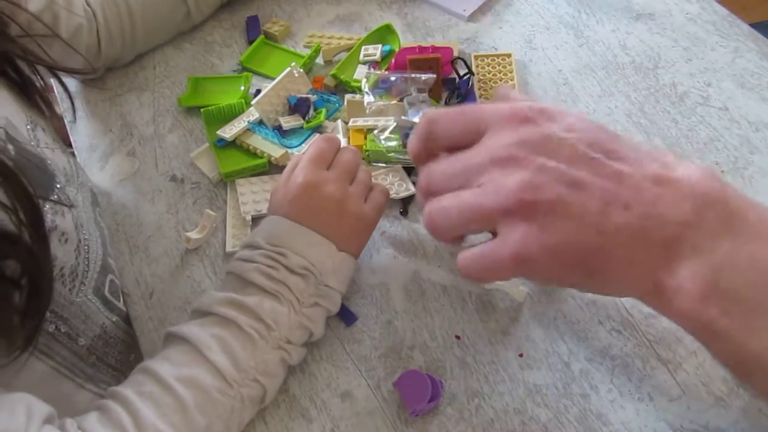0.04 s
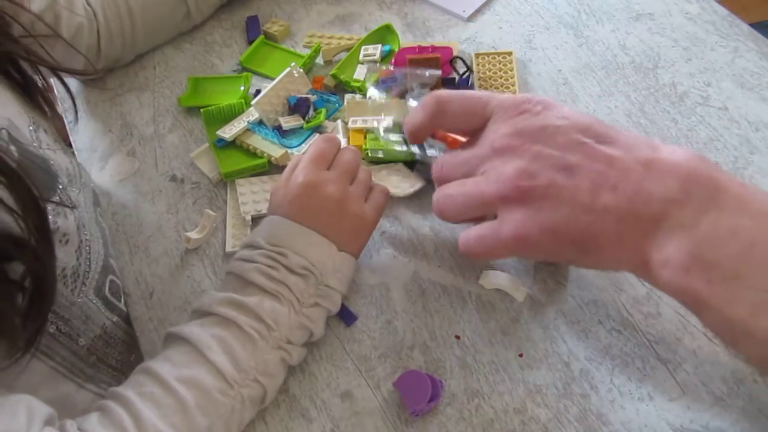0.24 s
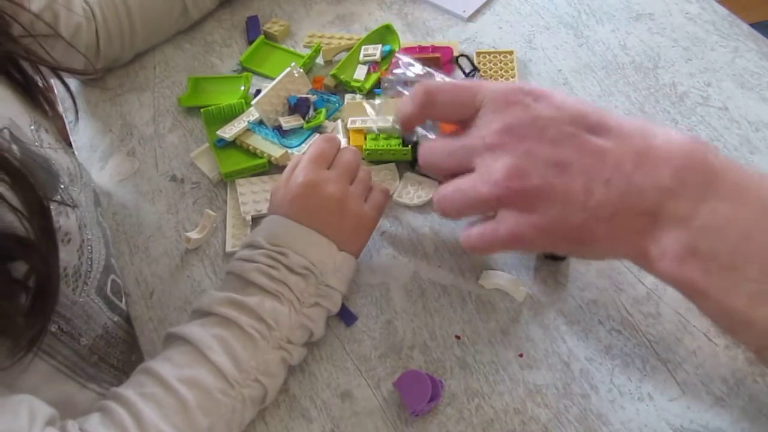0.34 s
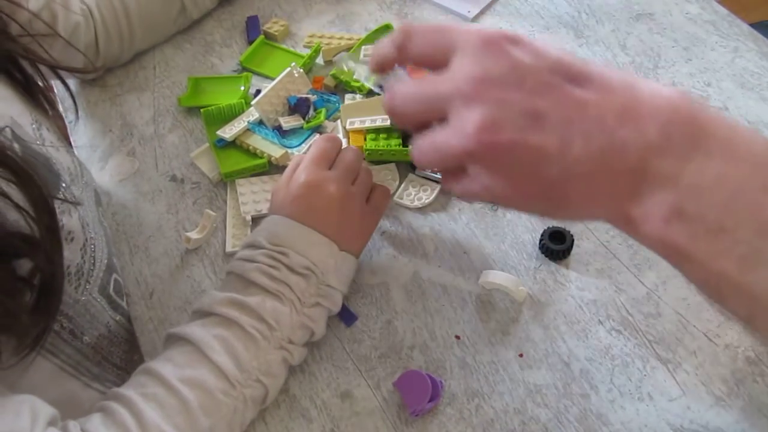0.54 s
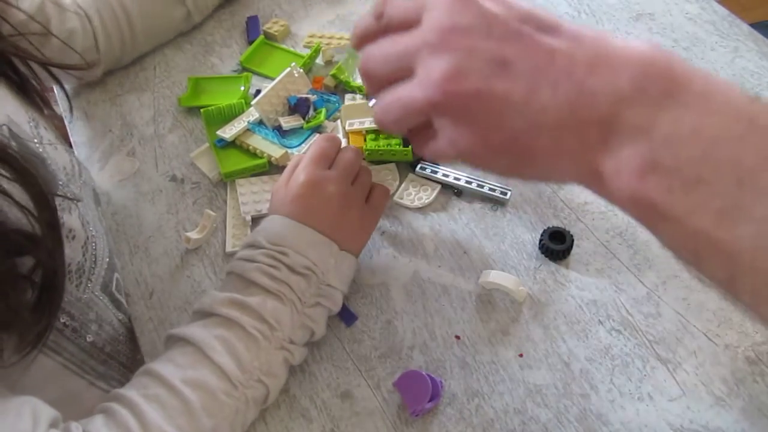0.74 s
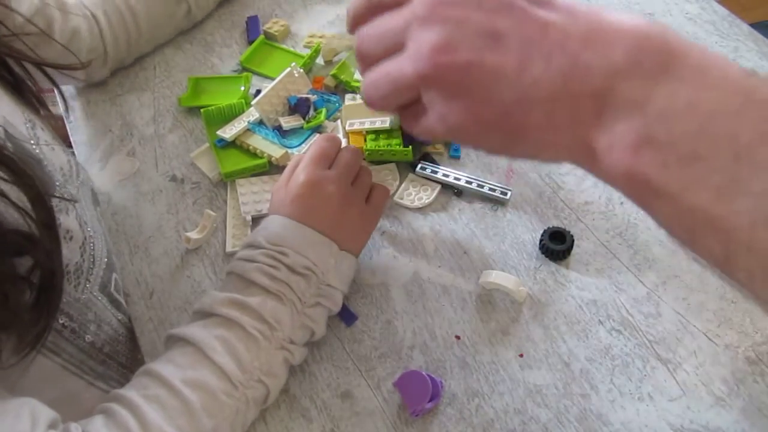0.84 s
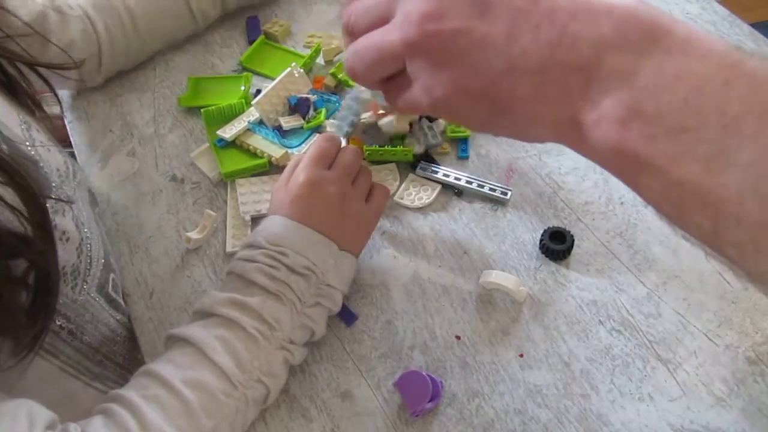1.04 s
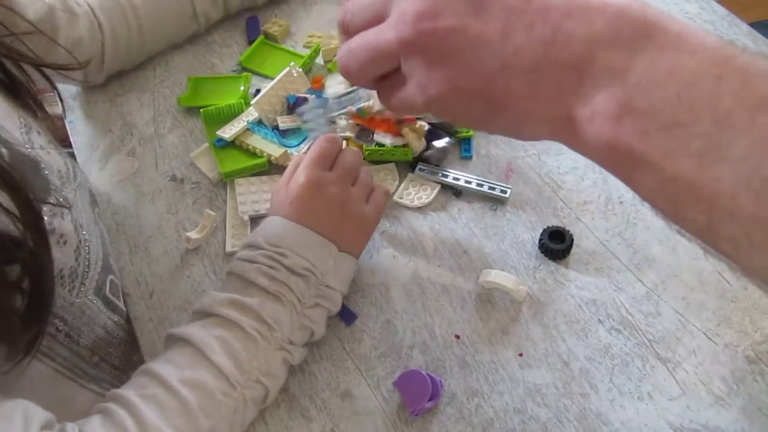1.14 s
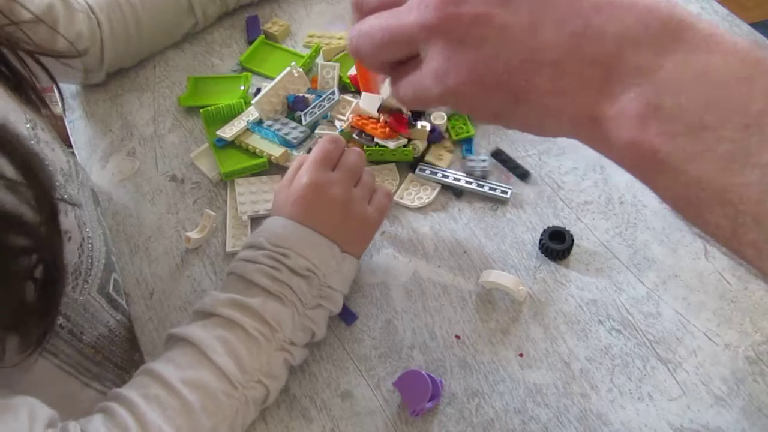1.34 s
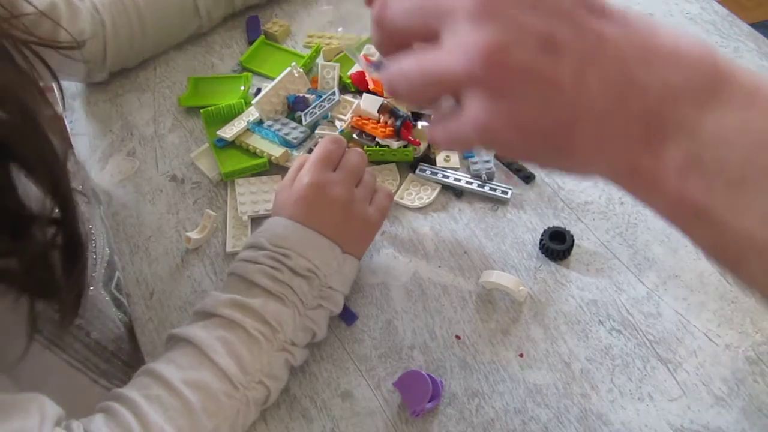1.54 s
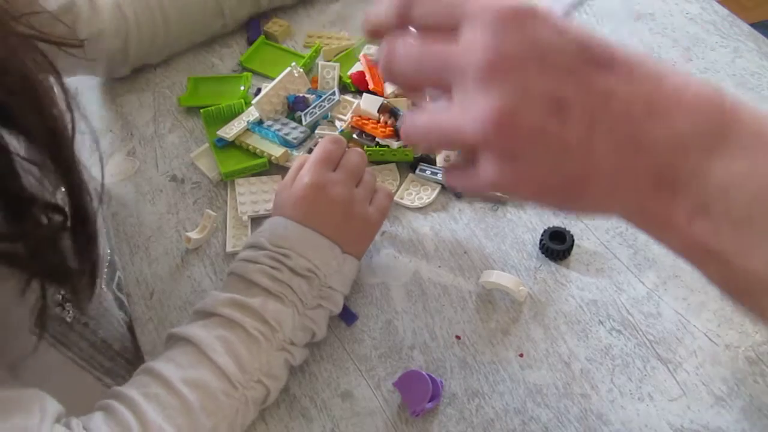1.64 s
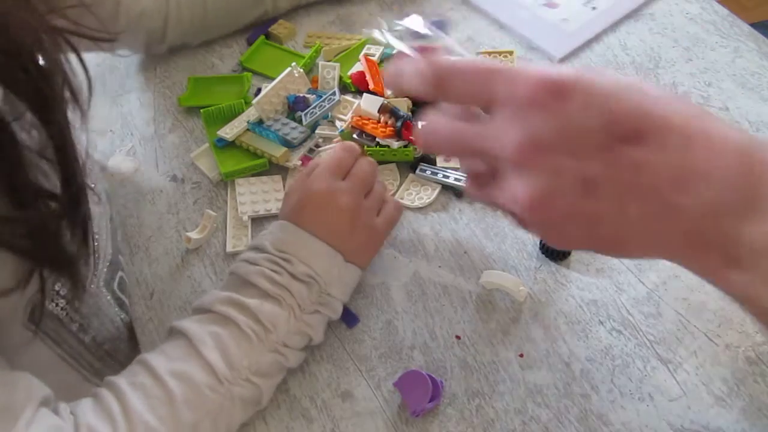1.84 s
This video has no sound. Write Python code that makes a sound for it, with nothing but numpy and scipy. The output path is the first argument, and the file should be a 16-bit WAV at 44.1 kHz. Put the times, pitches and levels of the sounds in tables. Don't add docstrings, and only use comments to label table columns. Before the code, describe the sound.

Bright, dry clatter of toy bricks tipped out twice, with one loud lone clack between, faint table thumps, bag snaps and a soft sleeve rub at the end; close microphone, small quiet room.

```python
import sys
import numpy as np
from scipy import signal
from scipy.fft import rfft, irfft, next_fast_len
from scipy.io import wavfile
from scipy.ndimage import uniform_filter1d

SR = 44100
rng = np.random.default_rng(int(sys.argv[2]) if len(sys.argv) > 2 else 0)


def boost_factor(decibels):
    exponent = np.asarray(decibels, float) / 20
    return 10 ** exponent


def inscribe(sig):
    pcm = np.round(np.clip(np.atleast_2d(sig).T, -1, 1) * 32767)
    wavfile.write(sys.argv[1], SR, pcm.astype(np.int16))


N = 83790


def rms_one(x):
    return x / np.sqrt(np.mean(x ** 2) + 1e-20)


def in_time(rows):
    return np.interp(np.arange(N) / SR, *np.transpose(rows))


def colour(x, points):
    hz, db = np.transpose(points)
    f = np.maximum(np.fft.rfftfreq(len(x), 1 / SR), 1)
    return irfft(rfft(x) * boost_factor(np.interp(np.log(f), np.log(hz), db)), len(x))


def evened(burst):
    f = rfft(burst)
    local_power = uniform_filter1d(np.abs(f) ** 2, size=len(f) // 20)
    return irfft(f / np.sqrt(local_power), len(burst))


def drift(rate_hz):
    r = np.exp(-2 * np.pi * rate_hz / SR)
    wander = signal.lfilter([1], [1, -2 * r, r * r], rng.standard_normal(N + SR))
    return rms_one(wander[SR:])


def ring(drive, hz, t60_s):
    r = boost_factor(-60 / (t60_s * SR))
    w = 2 * np.pi * min(hz, .45 * SR) / SR
    return signal.lfilter([0, np.sin(w)], [1, -2 * r * np.cos(w), r * r], drive + 1e-18)


def clicks(per_s, spread_db):
    sizes = boost_factor(spread_db * np.minimum(rng.exponential(1, N), 4)) * rng.choice([-1, 1], N)
    return sizes * (rng.random(N) < per_s / SR)


# frequency in Hz, level in dB per Hz.
BRICK_SPECTRUM = [(240, -58), (400, -19), (687, -12), (1030, -14.5), (2930, -4), (3260, -4), (6150, -3.5),
                  (10700, -3), (13000, -20.5), (16000, -34)]
CONTACT_S = 0.0014


def knocks(rows, burst_s, ring_db=-7.5):
    out, t = np.zeros(N + SR), np.arange(2048) / SR
    rise_s, wall_t60_s, crack_db, hollow_q = 0.00031, .014, -1, 3.8
    fade = np.cos(t / t[-1] * np.pi / 2)
    spectrum_hz, spectrum_db = np.transpose(BRICK_SPECTRUM)
    octaves = np.log2(np.clip(spectrum_hz, 500, 11000) / 4000)
    for s, db, hz, tilt in rows:
        noise, draw = rng.standard_normal(len(t)), rng.random(4)
        span_s = burst_s * (.7 + .6 * draw[0])
        envelope = (1 - np.exp(-t / rise_s)) * np.exp(-t / span_s)
        burst = evened(noise * np.sqrt(np.abs(noise)) * envelope)
        hollow = signal.lfilter(*signal.iirpeak(hz, hollow_q, fs=SR), burst)
        walls = ring(burst, hz, wall_t60_s)
        for d in draw[1:]:
            walls = walls + .5 * ring(burst, min(hz * (.7 + d), 12000), wall_t60_s / 2)
        lean_db = np.clip(tilt, -7, 5) * octaves
        crack = colour(burst, np.transpose([spectrum_hz, spectrum_db + lean_db]))
        parts = [(0, hollow), (ring_db, walls), (crack_db, crack)]
        knock = sum(boost_factor(g) * v / np.abs(v).max() for g, v in parts)
        i = int(s * SR)
        out[i:i + len(t)] += boost_factor(db) * knock / np.abs(knock).max() * fade
    return out[:N]


# start in seconds, peak in dB, strongest ring in Hz, tilt in dB per octave.
FIRST_POUR = [(0.0004, -28.5, 3320, 1), (0.2179, -30, 4250, -11), (0.2776, -14, 6760, -10.5),
              (0.282, -19, 3990, -9), (0.2903, -15, 10100, 1), (0.3114, -9, 5140, -3.5),
              (0.3134, -17, 5430, -14), (0.3219, -17, 5030, -12), (0.3355, -14, 4860, 6),
              (0.3392, -13.5, 11700, -4), (0.3424, -18, 5300, -11), (0.3757, -12, 8300, -2),
              (0.3818, -11, 4830, 10), (0.3857, -9.5, 8940, -3.5), (0.409, -18.5, 2100, -4.5)]
FIRST_TICKS = [
    (.272, -21, 6710, -8),
    (.2958, -12.5, 7840, -2.5),
    (.2985, -13, 4500, -5),
    (.3055, -18, 5220, -4),
    (.3485, -22, 9000, 5),
    (.4006, -24, 8900, -1),
    (.459, -26, 9400, 1),
    (.4703, -24.5, 4280, -5.5),
    (.7635, -29, 11000, 6.5),
]
STRAGGLERS = [(0.5307, -20, 2640, 6.5), (0.6064, -24, 4160, 0), (0.616, -24.5, 2070, 1),
              (0.636, -24.5, 3980, 5), (0.6543, -18.5, 2510, 8), (0.6599, -19, 9200, -1.5),
              (0.6644, -14.5, 7170, -1), (0.6723, -18, 4330, -2.5), (0.7235, -18, 2140, 5.5),
              (0.7421, -17.5, 2180, 2), (0.752, -23, 2330, 2), (0.7818, -24, 2380, -4),
              (0.7974, -25, 1810, -4.5), (0.8116, -22.5, 2110, -2), (0.8734, -25.5, 4800, -12),
              (0.8845, -21, 7880, -9), (0.8966, -11.5, 8100, 4), (0.9128, -9, 10500, 9),
              (0.9468, -19, 7900, 2)]
SECOND_POUR = [(.9672, -10, 6980, 2.5), (.9719, -6.5, 8800, -1.5), (.9855, -18, 5500, 4),
               (.9948, -10, 9460, 2), (1.002, -10, 11900, 0), (1.0114, -13.5, 9250, 4),
               (1.0232, -17, 4940, 0), (1.0317, -11.5, 11500, 7), (1.046, -18, 3600, 7),
               (1.054, -17.5, 4900, 9), (1.0696, -13, 9000, 3), (1.074, -20, 5470, 7),
               (1.0897, -15, 7850, 6), (1.1005, -14, 10200, 7), (1.1105, -13.5, 10800, 10),
               (1.12, -12, 8200, 8), (1.129, -14, 11300, 4), (1.1334, -13.5, 3430, 6),
               (1.1375, -13, 10000, 6), (1.143, -15, 9000, 4), (1.1515, -12, 8200, 5),
               (1.1645, -15, 10600, 4), (1.179, -18, 3200, 5), (1.187, -11.5, 4800, 3),
               (1.192, -13.5, 4700, -3), (1.2005, -10, 12700, 5), (1.213, -14, 8000, 3),
               (1.3215, -14, 8900, 6), (1.3276, -7, 10900, 4), (1.3325, -15.5, 8700, 9),
               (1.3402, -15, 6400, 4), (1.3725, -19.5, 3140, 1), (1.3795, -19, 6300, 2),
               (1.393, -20.5, 3130, 1)]
TICKS = [
    (.2405, -19.5, 3300, -6),
    (1.5965, -23, 807, -4),
    (.2478, -15.5, 3900, -11),
    (.7358, -15.5, 3860, -0.5),
    (.2552, -17, 5160, -5),
    (0.48, -24, 4200, -4),
    (1.6275, -18.5, 10100, -5.5),
    (1.857, -34.5, 3560, 3),
]


def pour_knocks():
    first = knocks(FIRST_POUR, CONTACT_S * 1.35) + knocks(FIRST_TICKS, CONTACT_S * 1.04)
    between = knocks(STRAGGLERS, CONTACT_S * 1.62)
    second = knocks(SECOND_POUR, CONTACT_S * 1.37, ring_db=-3.0)
    return first + between + second + knocks(TICKS, CONTACT_S * 1.34)


# frequency in Hz, width in Hz, level in dB.
CLACKS = [
    ((.2612, -8.5, .0004), [(544, 330, -11), (1580, 310, -1.5), (4680, 770, 1), (3600, 550, -6), (8450, 1000, -4.5), (10400, 900, -13)]),
    ((.5619, -3, .00016), [(1810, 290, -15), (2980, 410, -12), (3850, 340, -9), (5300, 510, -0.5), (7040, 1240, 0.5), (8300, 1600, 0), (10200, 480, -4.5), (12300, 830, -12.5)]),
    ((1.2628, -10.5, 0.0031), [(800, 700, -12), (4500, 900, -7), (1620, 650, -7.5), (2330, 390, 1.5), (3130, 430, 1), (5570, 270, -16), (7900, 230, 0), (9200, 230, 1)]),
    ((1.5661, -11, .0009), [(1120, 380, -10), (2290, 330, -7.5), (3380, 240, -6.5), (4820, 410, -2), (5880, 380, -4.5), (8000, 510, -1.5), (8810, 350, -4), (10100, 320, 0.5), (11900, 450, -13)]),
    ((1.699, -15, 0.00047), [(4260, 310, -7), (5940, 400, 0), (8200, 820, -3), (9600, 860, -2), (12600, 1800, -10)]),
]


def clacks():
    out, t = np.zeros(N + SR), np.arange(1024) / SR
    fade = np.cos(t / t[-1] * np.pi / 2)
    for (s, db, contact_s), modes in CLACKS:
        touch = evened(rng.standard_normal(len(t)) ** 3 * np.exp(-t / contact_s))
        clack = 0
        for j, (hz, width_hz, mode_db) in enumerate(modes):
            mode = signal.lfilter(*signal.iirpeak(hz, hz / width_hz, fs=SR), touch)
            clack = clack + boost_factor(mode_db) * (-1) ** j * mode
        clack = colour(clack, [(200, -30), (900, 0.5), (12500, -0.5), (16000, -13)]) * fade
        i = int(s * SR)
        out[i:i + len(t)] += boost_factor(db) * clack / np.abs(clack).max()
    return out[:N]


# time in seconds, level in dB.
FLOW = [(0, -55.5), (.19, -56.5), (.24, -32), (.31, -27.5), (.36, -35.5), (.42, -32.5), (.5, -45),
        (.64, -49.5), (.69, -39), (.77, -39.5), (.86, -45), (.95, -35), (.985, -28), (1.2, -28),
        (1.3, -33.5), (1.38, -32.5), (1.47, -49), (1.9, -51.5)]


def pour_flow():
    return in_time(FLOW)


STUD_HZ = [3224, 4890, 5320, 7960, 9280, 10730, 11930]


def clatter(flow_db):
    rate, spread_db = 5000 * boost_factor(3.0 * drift(90)), 2
    impacts, dealt = clicks(rate, spread_db), rng.integers(0, 40, N)
    pitches = np.geomspace(500, 15500, 40)
    rings = sum(ring(impacts * (dealt == k), hz, .011) for k, hz in enumerate(pitches))
    rings = rms_one(colour(rings, [(500, -2), (14000, 7)]))
    studs = sum(ring(clicks(rate / 40, spread_db), hz, 0.025) for hz in STUD_HZ)
    studs = boost_factor(-7) * rms_one(studs) * boost_factor(0.39 * (flow_db - flow_db.max()))
    decay = np.exp(-1 / (CONTACT_S * SR))
    bumps = signal.lfilter([1], [1, -decay], np.abs(clicks(400, 2.5)))
    rustle = rng.standard_normal(N) * (bumps + .15)
    mixed = rms_one(rings + studs) + boost_factor(-4.0) * rms_one(rustle)
    return boost_factor(flow_db) * rms_one(colour(mixed, BRICK_SPECTRUM))


# start in seconds, peak in dB, strongest ring in Hz, tilt in dB per octave.
SNAPS = [
    (1.479, -24.5, 6830, -2),
    (1.487, -30, 1650, -26.5),
    (1.508, -28, 3570, -7),
    (1.6085, -25.5, 1730, -2),
    (1.622, -13, 11300, -0.8),
    (1.744, -27.5, 4370, -1),
]
SHARP = [
    (.2014, -20, 9000, -4.5),
    (.2298, -15, 2230, -2),
    (.4378, -8, 6300, -2),
    (.8405, -27, 9000, 2),
]


def bag_snaps():
    return knocks(SNAPS, CONTACT_S * 0.72) + knocks(SHARP, .0003, ring_db=-11.0)


# start in seconds, peak in dB.
THUMPS = [(0.246, -36), (0.286, -36), (0.357, -29), (0.469, -41.5), (0.615, -42), (0.659, -40.5),
          (0.782, -39.5), (0.879, -40), (0.909, -34.5), (0.968, -32), (1.016, -31.5), (1.208, -29),
          (1.428, -40), (1.752, -56), (1.843, -39)]
# frequency in Hz, level in dB, t60 in seconds.
TABLE_MODES = [(130, -29, 0.1), (185, -8.5, 0.2), (205, -0.5, 0.27), (255, -3, 0.12), (296, -7, 0.1),
               (418, -6.5, 0.059), (502, -2, 0.046), (687, -3, 0.055)]


def table_top(flow_db):
    patter = boost_factor(-69.5) * rms_one(clicks(300, 4.2)) * boost_factor(flow_db - flow_db.max())
    s, thump_db = np.transpose(THUMPS)
    out = 0
    for hz, db, t60_s in TABLE_MODES:
        heavy = np.zeros(N)
        sizes = boost_factor(thump_db - 7.0 + rng.normal(0, 1.0, len(s)))
        heavy[(s * SR).astype(int)] = sizes * rng.choice([-1, 1], len(s))
        out = out + boost_factor(db) * ring(heavy + patter, hz, t60_s)
    hum = boost_factor(-61.5) * rms_one(ring(rng.standard_normal(N), 243.8, 1.2))
    begun = np.clip((np.arange(N) / SR - 0.21) * 20, 0, 1)
    band = signal.butter(4, [130, 1200], "band", fs=SR, output="sos")
    return signal.sosfilt(band, (out + hum) * begun)


# time in seconds, level in dB.
SLEEVE = [(.18, -75), (.3, -58), (1.5, -54), (1.62, -56.5), (1.78, -43.5), (1.83, -49.5), (1.9, -53.5)]
# frequency in Hz, level in dB per Hz.
SLIDE = [(59, -50), (100, -32), (257, -14.5), (368, -9), (781, -12), (1010, -22), (1520, -9), (2730, -15),
         (6000, -60), (7800, -64), (13200, -120)]


def sleeve():
    return boost_factor(in_time(SLEEVE) + 1.76 * drift(18)) * rms_one(colour(rng.standard_normal(N), SLIDE))


def room(x):
    t60_s, wall_cut_hz = .25, 7000
    n = next_fast_len(N + SR)
    z = np.exp(-2j * np.pi * np.fft.rfftfreq(n))
    dull = np.exp(-2 * np.pi * wall_cut_hz / SR)
    response = 0
    for k, lag in enumerate((rng.uniform(.003, .03, 10) * SR).astype(int)):
        loop = boost_factor(-60 * lag / SR / t60_s) * (1 - dull) / (1 - dull * z) * z ** lag
        response = response + (-1) ** k * loop / (1 - loop)
    for lag in (53, 149, 331):
        response = response * (z ** lag - .65) / (1 - .65 * z ** lag)
    return irfft(rfft(x, n) * response, n)[:N] / 3


# frequency in Hz, level in dB per Hz.
AIR = [(20, -8.5), (40, -10), (180, -12.5), (340, -19.5), (650, -9.5), (1500, -14.5), (3060, -7),
       (3600, -11.5), (11100, -23), (16000, -42)]


def air():
    return boost_factor(-52.5) * rms_one(colour(rng.standard_normal(N), AIR))


def scene():
    flow_db = pour_flow()
    hits = colour(pour_knocks() + bag_snaps(), [(150, -19), (500, -0.5), (11000, -1), (16000, -11.5)])
    near = hits + clacks() + clatter(flow_db)
    return (near + boost_factor(-12.0) * room(near) + table_top(flow_db) + sleeve() + air())[None]


def top_cut(x):
    return signal.sosfilt(signal.butter(12, 16970, fs=SR, output="sos"), x)


def record(dry):
    low_pass = signal.cheby2(10, 60, 17000, fs=SR, output="sos")
    mix = signal.sosfilt(low_pass, dry)
    return top_cut(mix)


dry = scene()
out = record(dry)
inscribe(out)
```